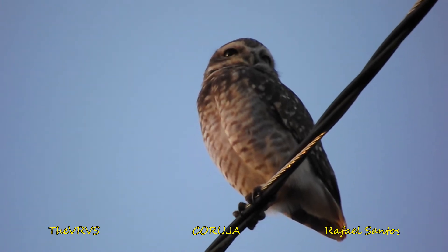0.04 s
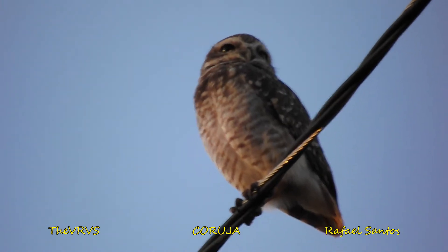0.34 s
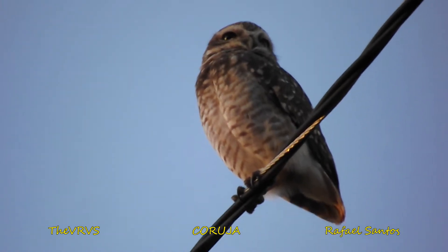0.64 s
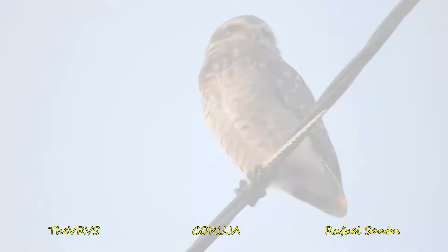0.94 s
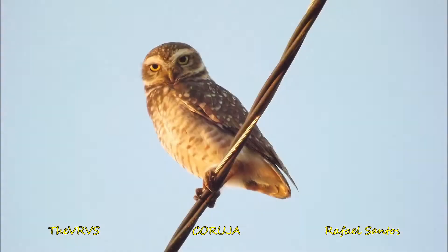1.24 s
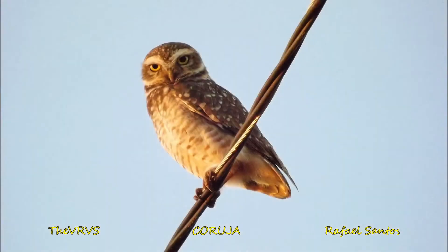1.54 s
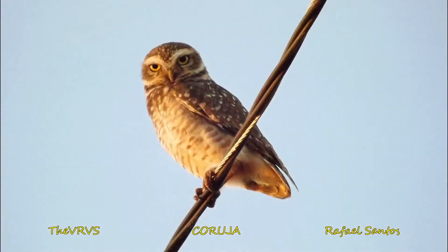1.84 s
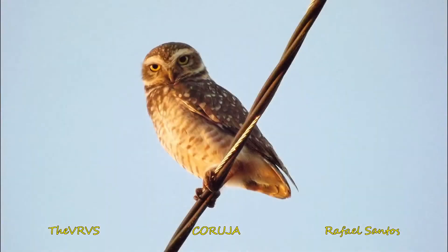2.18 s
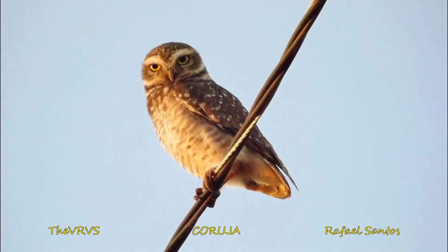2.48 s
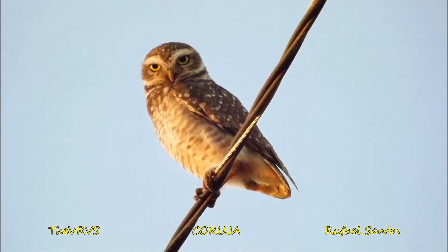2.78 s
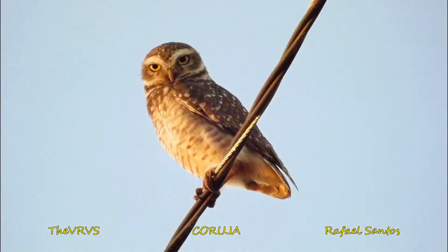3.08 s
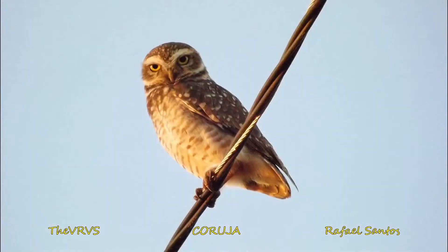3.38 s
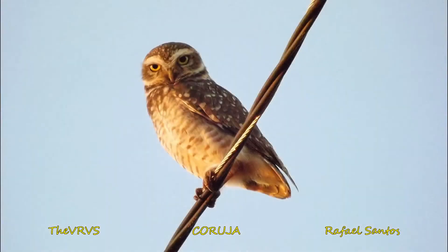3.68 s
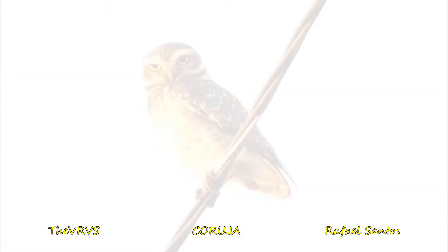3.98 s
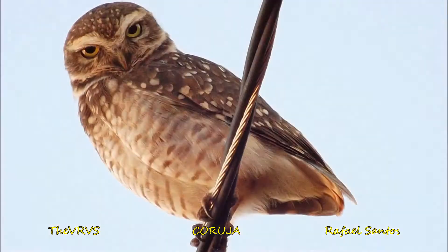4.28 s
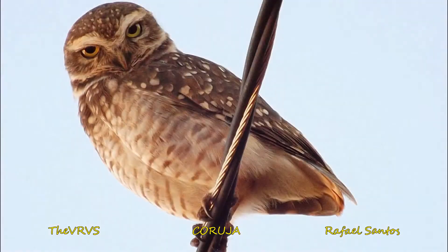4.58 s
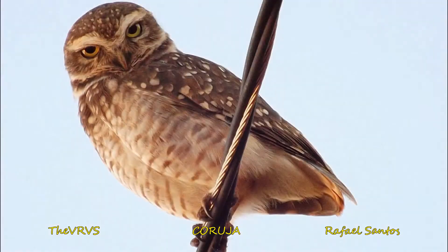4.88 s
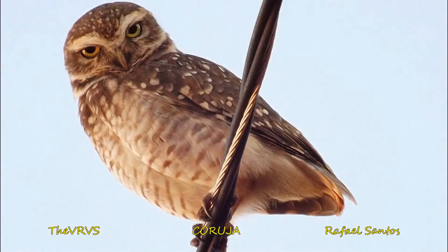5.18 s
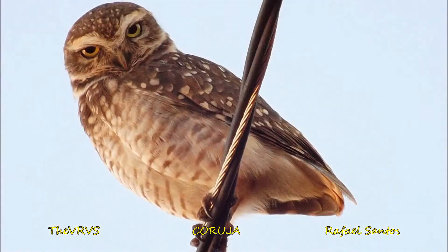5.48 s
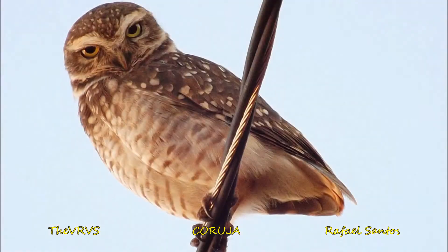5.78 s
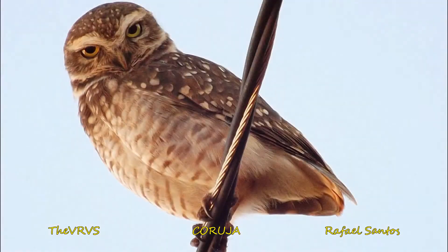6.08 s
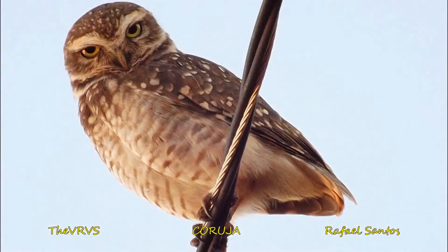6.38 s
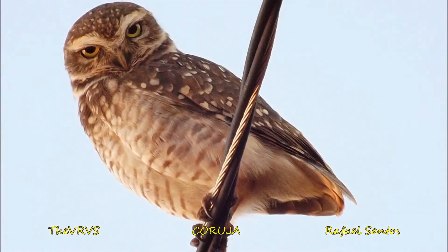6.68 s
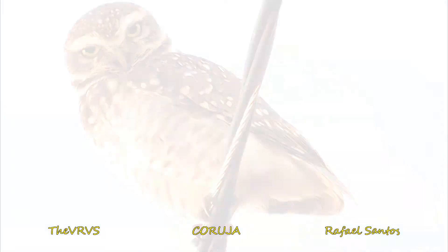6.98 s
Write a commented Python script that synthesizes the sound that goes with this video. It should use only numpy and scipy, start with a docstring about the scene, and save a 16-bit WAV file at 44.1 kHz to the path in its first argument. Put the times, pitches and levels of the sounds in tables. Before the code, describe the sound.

Close to the microphone in an open field, an owl gives four sharp, high chattering notes, then a rasping scream. A second run of chatter follows, overlapped by a louder scream, and trails off in softer notes. Songbirds whistle and buzz farther away, coming forward again near the end. Low wind rumble, soft hiss and faint insects continue underneath, with a thin echo.

```python
"""An open field, where a burrowing owl on a wire gives sharp chattering notes and two rasping screams.
Its voice is a high harmonic tone from vibrating membranes that breaks into a rasp when pushed hard,
coloured by its throat and open beak. Songbirds whistle and buzz farther off; the field returns a thin
echo. Underneath lie a low wind rumble, a soft hiss, a faint drone and insects.
Twice the hiss abruptly changes level with a tiny click."""
import sys
import numpy as np
from scipy import signal
from scipy.fft import rfft, irfft
from scipy.io import wavfile
from scipy.ndimage import uniform_filter1d

SR = 44100
rng = np.random.default_rng(int(sys.argv[2]) if len(sys.argv) > 2 else 0)


def master_out(mix):
    """Clip the mix to full scale and print it as 16-bit PCM to the path in sys.argv[1]."""
    frames = np.transpose(np.atleast_2d(mix))
    ceiling = np.clip(frames, -1, 1)
    pcm = np.round(ceiling * 32767).astype(np.int16)
    wavfile.write(sys.argv[1], SR, pcm)


N = 310023
TIME, BINS = np.arange(N) / SR, np.fft.rfftfreq(N, 1 / SR)

# slow swells and sudden steps shared by the hiss and the insects: (time [s], gain [dB])
BED_STEPS = [(0, -0.5), (1.305, 3.5), (1.32, -1), (4.785, 0.5), (4.8, -4), (6.075, -2.5), (6.1, 1.5),
             (7.03, 0)]


def gain_of(db):
    """Decibels to amplitude."""
    return 10 ** (np.asarray(db) / 20)


def unit_rms(x):
    """Scales to rms 1."""
    return x / np.sqrt(np.mean(x ** 2) + 1e-20)


def curve_at(points, hz):
    """Reads a curve drawn with straight lines on a log-frequency axis."""
    f, value = np.transpose(points)
    return np.interp(np.log(hz + 1), np.log(f + 1), value)


def follow(rows, t):
    """Every column of an automation curve at the times t."""
    times, *columns = np.transpose(rows)
    return [np.interp(t, times, column) for column in columns]


def add(mix, start, sound):
    """Mixes a sound in at a start time in seconds."""
    part = mix[max(round(start * SR), 0):][:len(sound)]
    part += sound[:len(part)]


def colour(x, gain):
    """Filters a full-length signal by a gain for each bin."""
    return irfft(rfft(x) * gain, N)


def flutter(size, hz):
    """Smooth random motion of rms about 1, up to about hz."""
    padded = size + SR // 4
    rolloff = np.sqrt(1 + (np.fft.rfftfreq(padded, 1 / SR) / hz) ** 4)
    return unit_rms(irfft(rfft(rng.standard_normal(padded)) / rolloff))[:size]


def ramp(x):
    """Limits to the range 0 to 1."""
    return np.clip(x, 0, 1)


def wind(steadiness=0.39, split_hz=48):
    """Wind at the microphone: slow buffeting and the rumble above it each swell with the gusts, and both drop
    suddenly at 4.8 s."""
    # wind levels, which swell and ebb and drop suddenly at 4.8 s: (time [s], buffeting level [dB], rumble level
    # [dB])
    wind_levels = [(0, -23.5, -25), (.42, -18.5, -23.5), (.8, -34, -22.5), (1.05, -22, -24), (1.499, -29, -27.5),
                   (2.0, -26.5, -27), (3.76, -25, -26), (4.3, -27, -28), (4.47, -19.5, -28), (4.77, -22, -26),
                   (4.84, -35, -31.5), (5.5, -29.5, -30), (6.05, -33.5, -30), (6.18, -26.5, -26.5),
                   (7.03, -31, -29)]
    # wind spectrum: (frequency [Hz], relative level [dB])
    spectrum = [(11, -26), (18, -5.5), (38, 3), (57, 0), (104, -8.5), (275, -27.5), (330, -31), (430, -38),
                (730, -120)]
    noise, out = rng.standard_normal(N), np.zeros(N)
    lows = 1 / (1 + (BINS / split_hz) ** 8)
    for share, db in zip([lows, 1 - lows], follow(wind_levels, TIME)):
        band = unit_rms(colour(noise, share * gain_of(curve_at(spectrum, BINS))))
        envelope = np.sqrt(abs(uniform_filter1d(band ** 2, size=3500)) + 1e-6)
        out += band / envelope ** steadiness * gain_of(db)  # gentle compression tames the lumps
    return out


def air(base_db=-38, body_hz=1300, body_share=0.19):
    """Soft open-country hiss whose treble steps up and down more than its body."""
    # hiss spectrum: (frequency [Hz], relative level [dB])
    spectrum = [(160, -56), (280, -13.5), (441, -4.5), (487, -3.5), (567, -3), (705, -6.5), (1380, -12.5),
                (1750, -15), (1930, -15), (2250, -16.5), (2750, -16.5), (3310, -16.5), (4180, -13.5),
                (4780, -30.5), (15500, -42)]
    hiss = gain_of(base_db) * unit_rms(colour(rng.standard_normal(N), gain_of(curve_at(spectrum, BINS))))
    body = colour(hiss, 1 / (1 + (BINS / body_hz) ** 2))
    step_db = follow(BED_STEPS, TIME)[0] + 0.5 * flutter(N, hz=6)
    return body * gain_of(body_share * step_db) + (hiss - body) * gain_of(step_db)


def drone(width_hz=14, trim_db=-3):
    """A faint, blurred hum that comes and goes, perhaps far traffic."""
    # hum tone: (frequency [Hz], level before the trim [dB])
    tones = [(672.9, -52.5)]
    hum = sum(gain_of(db) * flutter(N, width_hz) * np.sin(2 * np.pi * hz * TIME) for hz, db in tones)
    return np.sqrt(2) * gain_of(trim_db) * hum


def insects(throb_db=1.6):
    """A far chorus blurs into narrow, gently throbbing bands."""
    # insect bands: (centre [Hz], width [Hz], base level [dB])
    bands = [(4197, 196, -46.5), (1927, 124, -53.5), (2810, 54, -54.5), (11472, 4, -76.5),
             (11600, 300, -71)]
    chorus = np.zeros(N)
    for hz, width, db in bands:
        bell = np.exp(-((BINS - hz) / width) ** 2)
        chorus += gain_of(db) * unit_rms(colour(rng.standard_normal(N), bell))
    return chorus * gain_of(follow(BED_STEPS, TIME)[0] + throb_db * flutter(N, hz=25))


def clicks(decay_s=0.00085):
    """Two tiny splice clicks where the background hiss abruptly changes level."""
    # clicks at the steps in the hiss: (time [s], peak [dB])
    spikes = [(1.308, -18), (4.788, -15)]
    out = np.zeros(N)
    for start, db in spikes:
        add(out, start, gain_of(db) * np.exp(-np.arange(64) / SR / decay_s))
    return out


def field_echo(send, build_s=0.031, returns_per_s=2000):
    """Scattered returns from ground and scrub, each band dying at its own speed."""
    # echo decay: (frequency [Hz], time to fall 60 dB [s])
    decay = [(2000, 3.4), (4300, 1.52), (6000, 1.34), (12000, 0.74)]
    t = np.arange(SR) / SR
    taps = rng.standard_normal(SR) * (rng.random(SR) < returns_per_s / SR) * (1 - np.exp(-t / build_s))
    hz, times, bands = signal.stft(taps, SR, nperseg=256)
    fade = gain_of(-60 * times / curve_at(decay, hz)[:, None])
    tail = signal.istft(bands * fade, SR, nperseg=256)[1]
    return signal.fftconvolve(send, tail / np.linalg.norm(tail))[:N]


def syllable(length, start_hz, held_hz, end_hz, db, buzz, overtone_db, buzz_hz=176, smear=0.069):
    """A whistle that slides onto a held pitch and off it; a buzzy one is chopped into fast pulses."""
    progress = np.linspace(0, 1, int(length * SR))
    size = len(progress)
    glide = held_hz + (start_hz - held_hz) * (1 - progress) ** 5 + (end_hz - held_hz) * progress ** 2.5
    pitch = glide * (1 + smear * buzz * flutter(size, hz=600) + 0.0058 * flutter(size, hz=122))
    phase = 2 * np.pi * np.cumsum(pitch) / SR
    fifth, octave = np.sin(1.5 * phase), np.sin(2 * phase)
    grit = 1 - buzz + buzz * flutter(size, hz=700)  # a buzz smears the overtones into a haze
    tone = np.sin(phase) + gain_of(overtone_db) * grit * (fifth + 0.16 * octave)
    pulses = 1 + buzz * np.cos(2 * np.pi * buzz_hz * length * progress)
    flicker = gain_of(2.5 * flutter(size, hz=60))  # moving air makes a far whistle flicker
    return gain_of(db) * unit_rms(tone * pulses * flicker * signal.windows.tukey(size, 0.35))


def songbirds():
    """One bird sings its phrase twice; others add arched whistles, falling chips and rising chirps."""
    # song: (offset [s], length [s], start [Hz], held [Hz], end [Hz], level [dB], buzz [0-1],
    # overtones [dB])
    phrase = [(0, .042, 3040, 2774, 2520, -37, 0.65, -26), (.076, 0.14, 4407, 4216, 3710, -32, 0.8, -21),
              (0.186, .085, 3950, 3790, 3290, -36, .8, -17),
              (0.225, 0.094, 5600, 5230, 4760, -47, 0.3, -25),
              (.262, 0.052, 3035, 3330, 2480, -34, 0.44, -26), (.38, .056, 3410, 4070, 2940, -27, 0.2, -30),
              (0.539, .078, 2930, 3435, 3360, -35.5, .03, -12.5),
              (.598, 0.151, 3460, 3562, 3560, -31.5, 0.06, -19),
              (0.721, 0.039, 3340, 3900, 4580, -44.5, 0.1, -10),
              (0.736, .13, 3500, 3455, 3070, -35.5, 0.03, -17)]
    # entries of the song: (time [s], gain [dB])
    entries = [(.647, 0), (6.133, -0.5)]
    # arches: (time [s], length [s], top [Hz], level [dB], rise [share of top], fall [share of top])
    whistles = [(1.09, .047, 3380, -36, .13, 0.29), (1.131, 0.24, 2676, -44.5, 0.098, .06),
                (1.33, 0.2, 2910, -43, 0.07, .075), (2.124, 0.21, 2956, -41.5, 0.27, 0.15),
                (2.222, 0.16, 3320, -42, 0.12, 0.015), (6.144, 0.089, 3284, -32, 0.077, 0.0066),
                (6.552, .31, 2760, -45.5, 0.27, 0.14)]
    # thin chips: (time [s], length [s], level [dB])
    chips = [(2.575, 0.027, -51), (4.164, 0.021, -48), (5.128, .03, -51)]
    # the glide of every chip: (start [Hz], held [Hz], end [Hz])
    chip_glide = (6150, 5500, 4960)
    # buzzy chirps: (time [s], length [s], start [Hz], held [Hz], end [Hz], level [dB])
    chirps = [(5.936, .058, 3100, 3750, 4850, -44), (6.068, .026, 2850, 3150, 3600, -43),
              (6.338, .022, 2350, 2650, 3100, -38)]
    out = np.zeros(N)
    for start, db in entries:
        for offset, *shape in phrase:
            add(out, start + offset, gain_of(db) * syllable(*shape))
    for start, length, hz, db, rise, fall in whistles:
        arch = hz * (1 - rise), hz, hz * (1 - fall)
        add(out, start, syllable(length, *arch, db, buzz=0.062, overtone_db=-23))
    for start, length, db in chips:
        add(out, start, syllable(length, *chip_glide, db, buzz=0.2, overtone_db=-35))
    for start, *shape in chirps:
        add(out, start, syllable(*shape, buzz=0.58, overtone_db=-29))
    return out


def syrinx(hz, level_db, rough, subharmonic_db, fundamental_db, jitter=0.043, waver=0.0048):
    """Membranes beat out harmonics; pushed hard they swing unevenly and the tone breaks into a rasp."""
    # overtones of the clear voice: (harmonic [number], relative level [dB])
    overtones = [(2, 2), (3, -12), (4, -11.5), (5, -7.5)]
    # noise bands of the broken voice: (centre [multiple of the pitch], width [Hz], relative level [dB])
    rasp_bands = [(1.68, 263, -6), (2, 236, 1.5), (2.399, 300, -2.5), (2.9, 200, 0), (3.88, 280, -5.5),
                  (4.9, 406, -40)]
    size = len(hz)
    pitch = hz * (1 + jitter * rough * flutter(size, hz=301) + waver * flutter(size, hz=90))
    phase = 2 * np.pi * np.cumsum(pitch) / SR
    tone = sum(gain_of(db) * np.cos(harmonic * phase) for harmonic, db in overtones)
    tone *= 1 + gain_of(subharmonic_db) * np.cos(phase / 2)  # strong and weak beats alternate
    rasp = np.zeros(size)
    for multiple, width, db in rasp_bands:
        fuzz = flutter(size, width) + 1j * flutter(size, width)
        rasp += gain_of(db) * (fuzz * np.exp(1j * multiple * phase)).real / 2
    power = abs(uniform_filter1d(rasp ** 2, size=60))
    rasp *= np.sqrt(2.08 / (1 + power))  # the membranes can swing only so far
    breath = gain_of(-6) * (0.5 + 1.1 * rough) * rng.standard_normal(size)
    # the fundamental holds on, fluttering, when the overtones break
    fundamental = gain_of(fundamental_db) * np.cos(phase) * (1 + 0.45 * rough * flutter(size, hz=131))
    crossfade = ((1 - rough) * tone + rough * rasp) / np.hypot(1 - rough, rough)
    voice = fundamental + crossfade + breath
    return np.sqrt(2) * gain_of(level_db) * voice * signal.windows.tukey(size, 0.03)


def crack(t, peak=0.81, at_s=0.01736, width_s=0.0089):
    """The burst of roughness as the owl's voice sets in."""
    return peak * np.exp(-((t - at_s) / width_s) ** 2)


def chatter_note(length, break_at, hz, sag, db, subharmonic_db, rough):
    """A cracked scoop up, a clearer sagging hold, then a break into rasp as the pitch drops away."""
    attack_s, scoop_s, break_s, drop_s = 0.026, 0.028, 0.0077, 0.05
    t = np.arange(int(length * SR)) / SR
    scoop = 1 - ramp(t / scoop_s) ** 2
    held_s = np.maximum(t - scoop_s, 0)
    drop = ramp(1 - (length - t) / drop_s)
    bend = 0.29 * scoop + 0.32 * np.sin(np.pi / 2 * drop) ** 2
    pitch = (hz - sag * held_s) * (1 - bend)
    level_db = db - 25.5 * ramp(1 - t / attack_s) - 39 * held_s - 28.5 * drop ** 2.4
    broken = 0.73 * ramp((t - break_at) / break_s) * (1 - 0.2 * drop)  # clears a little in the drop
    # the fundamental sounds only near the top of the arch, and stands out more in soft notes
    softness_db = max(-18.5 - db, 0)
    fundamental_db = -1.5 + 0.19 * softness_db - 60 * bend
    return syrinx(pitch, level_db, ramp(rough + crack(t) + broken), subharmonic_db, fundamental_db)


def scream(glide, start, length, attack, release, db, fade, rough, break_up, full_rough=0.875):
    """A sudden, slightly wavering cry that weakens steadily while its tone breaks up into a rasp."""
    t = np.arange(int(length * SR)) / SR
    level_db = db + fade * t - 12 * ramp(1 - t / attack) - 12.5 * ramp(1 - (length - t) / release)
    rough = rough + crack(t) + (full_rough - rough) * ramp(t / break_up)
    pitch = follow(glide, start + t)[0] * (1 + 0.00903 * flutter(len(t), hz=22.1))
    return syrinx(pitch, level_db, ramp(rough), subharmonic_db=-13, fundamental_db=-1)


def owl():
    """Chatter and two screams, all shaped by the resonances of one throat and open beak."""
    # chatter: (time [s], length [s], break after [s], pitch [Hz], sag [Hz/s], source level [dB],
    # subharmonic depth [dB], base roughness [0-1])
    notes = [(0.016, 0.12, 0.084, 2230, 1076, -12, -12.5, 0.19),
             (.282, 0.12, 0.077, 2258, 1503.5, -11.5, -10.5, 0.14),
             (0.544, 0.12, 0.0803, 2244, 1033, -12, -8, 0.19),
             (0.824, 0.11, 0.0784, 2267, 2018, -12.5, -12.5, 0.21),
             (2.354, 0.12, 0.0546, 2060, 400, -15, -20.5, 0.22),
             (2.607, .115, .08, 2122, 1113.5, -14, -24, 0.16),
             (2.858, .12, 0.085, 2202, 1417, -14, -14.5, 0.21),
             (3.115, 0.12, .08, 2214, 1371, -13, -13, 0.17),
             (3.379, 0.12, 0.048, 2250, 1622, -17.5, -20, 0.3), (3.493, .09, 0.061, 2005, -2, -24, -24, 0),
             (3.653, .1, 0.069, 2273, 2276, -18.5, -26, 0.1),
             (3.978, 0.11, 0.063, 2200, 1495, -30, -10, 0.28),
             (4.042, 0.11, 0.069, 2142, 1410, -27.5, -24, 0.2),
             (4.139, 0.1, .065, 2173, 1000, -33.5, -14, 0.25)]
    # screams: (time [s], length [s], attack [s], release [s], source level [dB], fade [dB/s],
    # starting roughness [0-1], break-up time [s])
    cries = [(1.599, 0.64, 0.015, 0.094, -21, -14, 0.4, 0.29),
             (3.191, 0.72, 0.032, 0.29, -12.5, -20, 0.11, 0.309)]
    # one pitch curve per scream: (time [s], pitch [Hz])
    glides = [
        [(1.6, 1821), (1.71, 1926), (1.82, 1836), (2.2, 1773)],
        [(3.195, 1890), (3.222, 2210), (3.34, 2196), (3.51, 2044), (3.6, 2098), (3.92, 2012)],
    ]
    # throat and beak response: (frequency [Hz], gain [dB])
    throat = [(500, -73), (1300, -20), (1800, -18), (2250, -18.5), (2600, -9), (3300, -1.5), (4000, -1),
              (4450, -5), (4900, -10.5), (6300, -21.5), (7000, -21.5), (8300, -24.5), (9300, -35),
              (15500, -42)]
    # throat colour per scream, weaker the wider the beak gapes: (depth [factor on the throat's dB])
    colour_depths = [0.89, 0.89]
    throat_db = curve_at(throat, BINS)
    chatter, screams = np.zeros(N), np.zeros(N)
    for start, *shape in notes:
        add(chatter, start, chatter_note(*shape))
    for (start, *shape), glide, depth in zip(cries, glides, colour_depths):
        cry = np.zeros(N)
        add(cry, start, scream(glide, start, *shape))
        screams += colour(cry, gain_of(depth * throat_db))
    return colour(chatter, gain_of(throat_db)) + screams


def scene():
    """The near owl and the far birds share the field's echo, over the background bed, all in mono."""
    near, far = owl(), songbirds()
    echo = field_echo(gain_of(-16) * near + gain_of(-10) * far)
    mono = near + far + echo + wind() + air() + drone() + insects() + clicks()
    return np.array([mono, mono])


def record(dry, cutoff_hz=15750):
    """Delays the left channel by one sample and cuts the top treble steeply."""
    pair = np.array([np.append(0, dry[0, :-1]), dry[1]])
    lowpass = signal.firwin(511, cutoff_hz, window=("kaiser", 9), fs=SR)
    return signal.oaconvolve(pair, lowpass[None], "same")


dry = scene()
out = record(dry)
master_out(out)
```